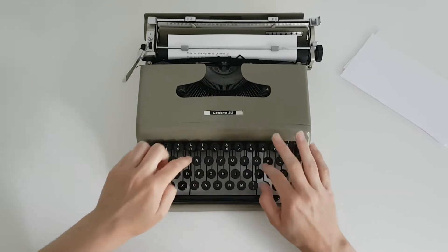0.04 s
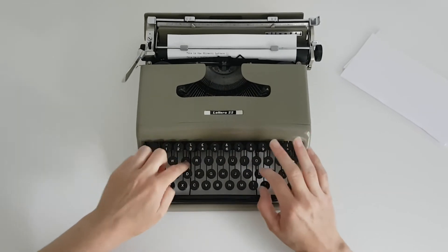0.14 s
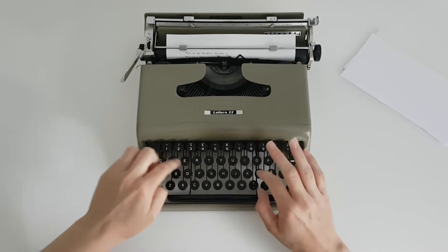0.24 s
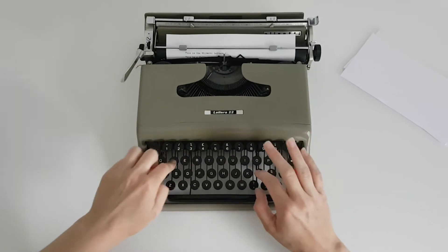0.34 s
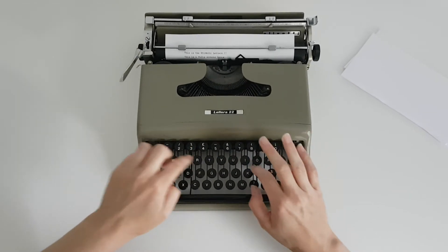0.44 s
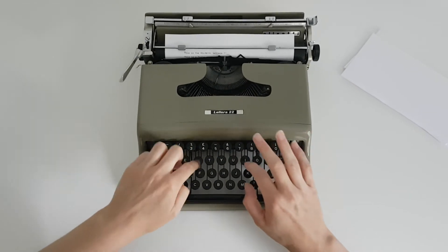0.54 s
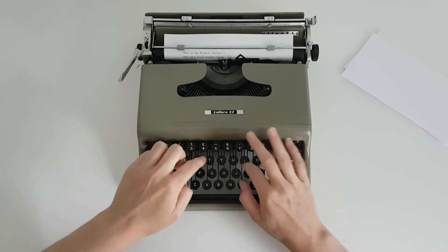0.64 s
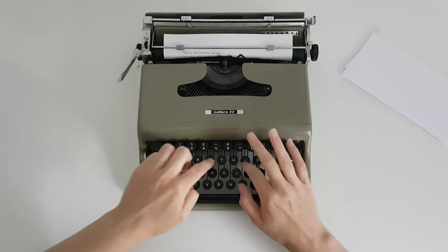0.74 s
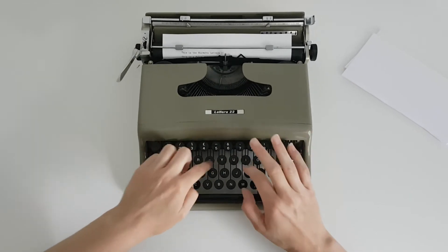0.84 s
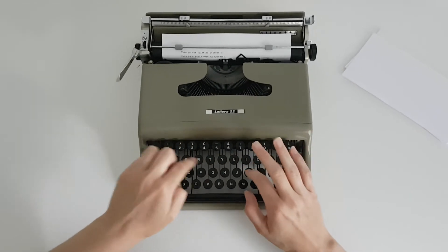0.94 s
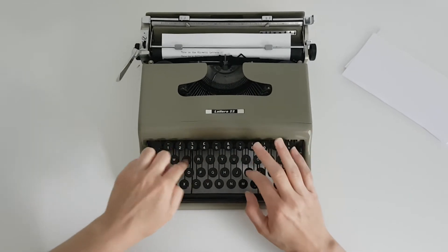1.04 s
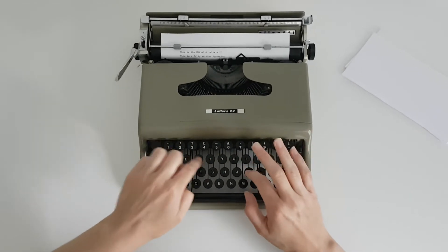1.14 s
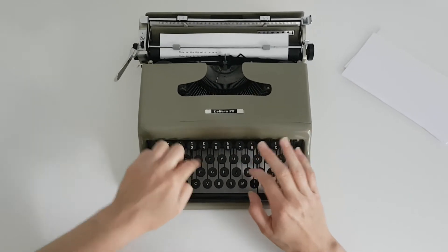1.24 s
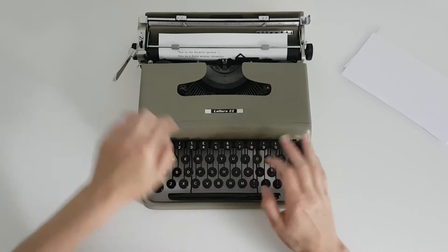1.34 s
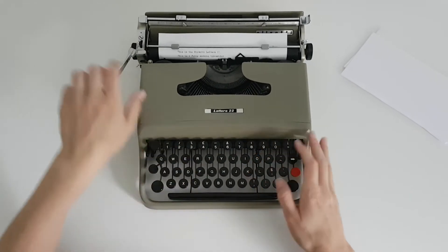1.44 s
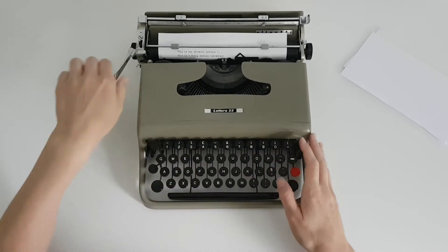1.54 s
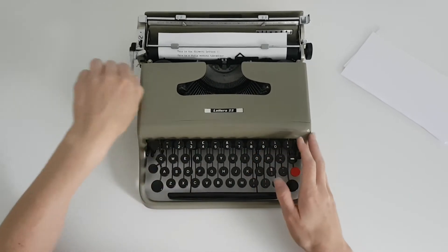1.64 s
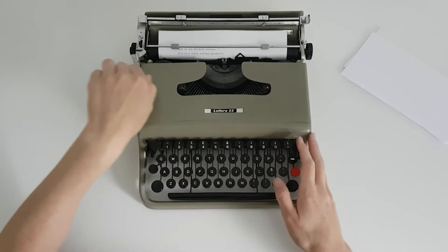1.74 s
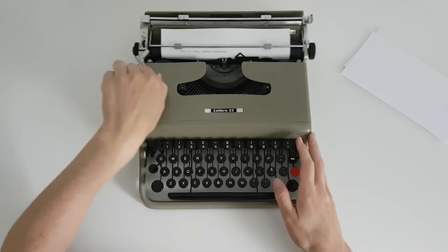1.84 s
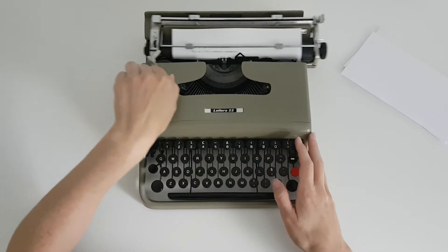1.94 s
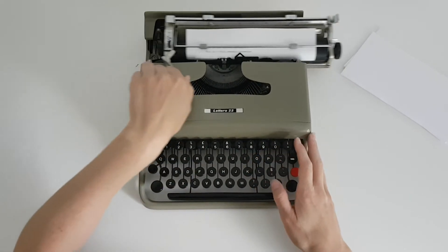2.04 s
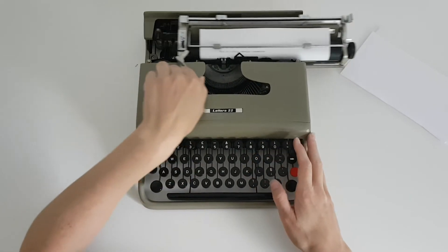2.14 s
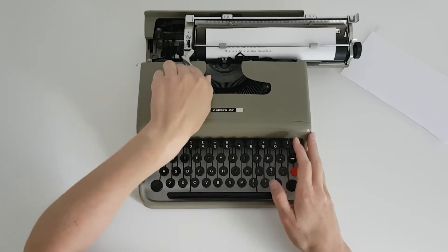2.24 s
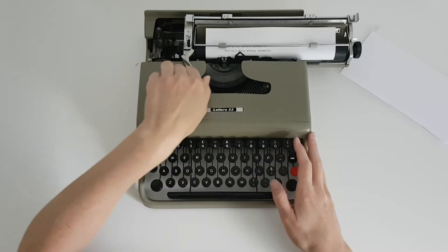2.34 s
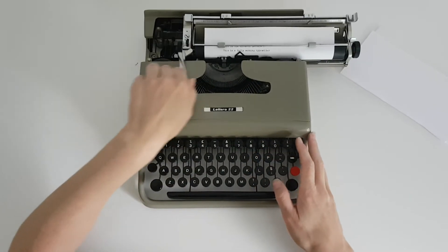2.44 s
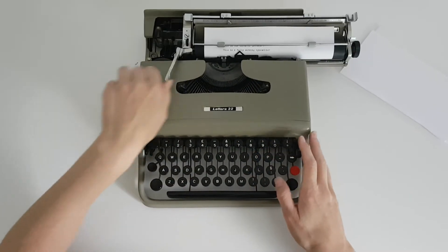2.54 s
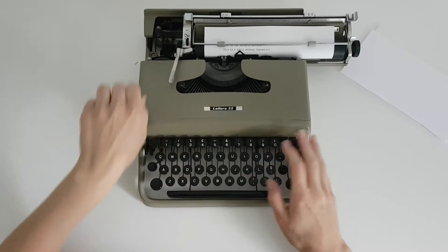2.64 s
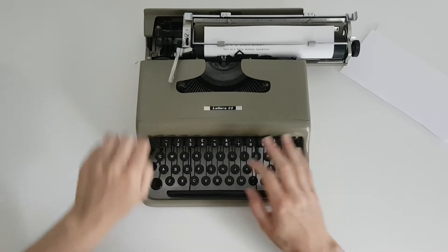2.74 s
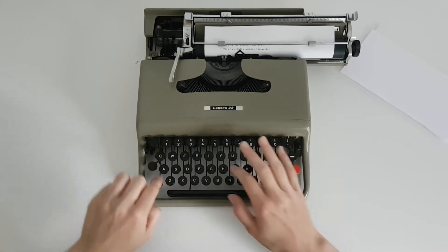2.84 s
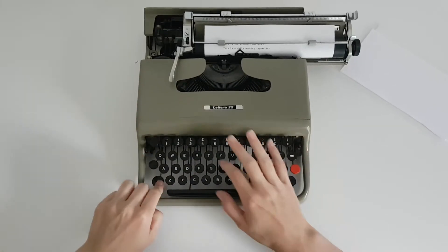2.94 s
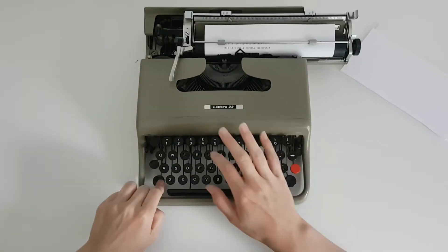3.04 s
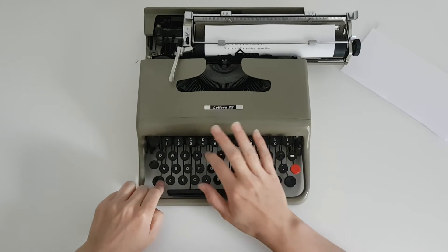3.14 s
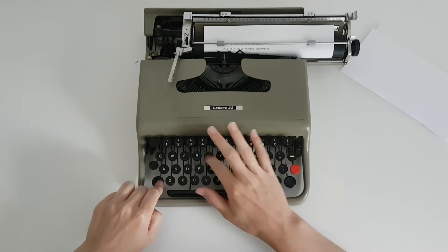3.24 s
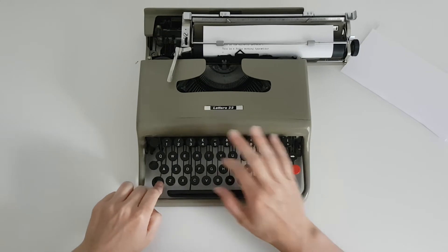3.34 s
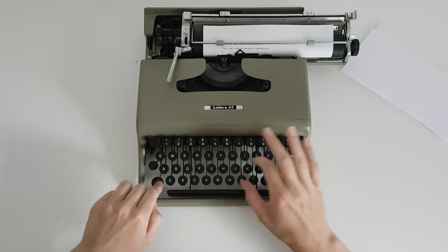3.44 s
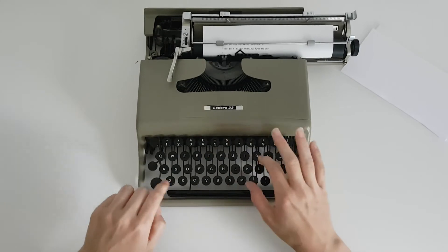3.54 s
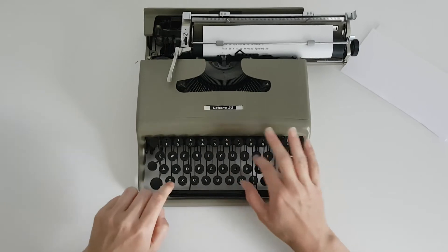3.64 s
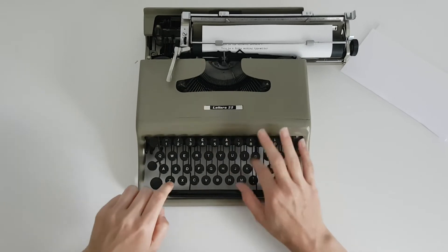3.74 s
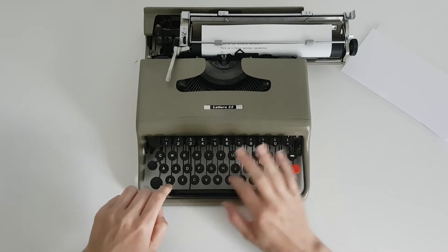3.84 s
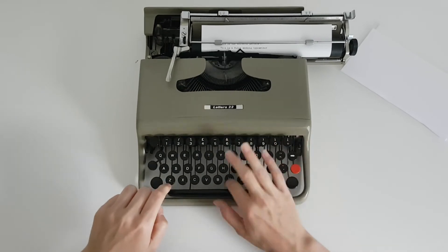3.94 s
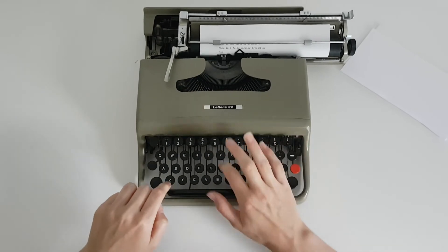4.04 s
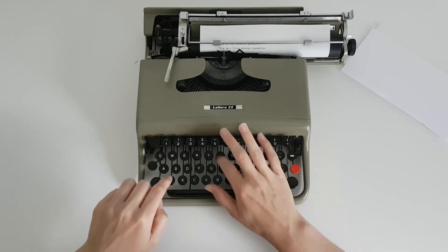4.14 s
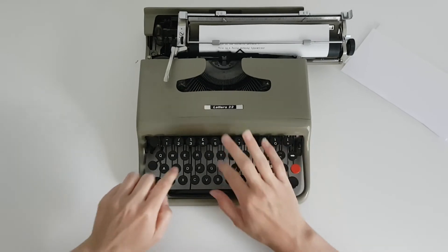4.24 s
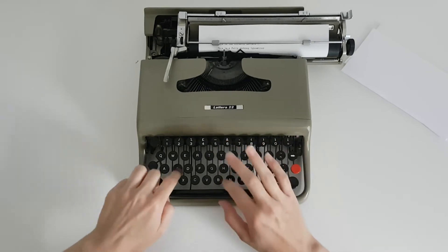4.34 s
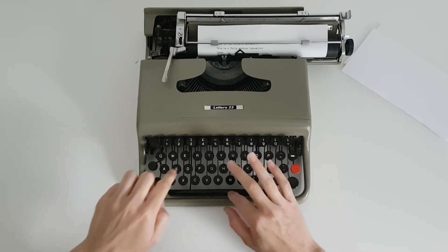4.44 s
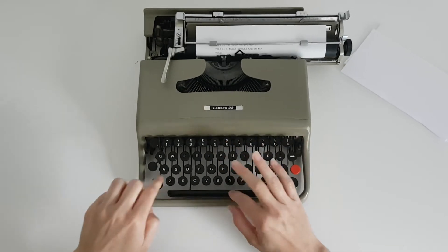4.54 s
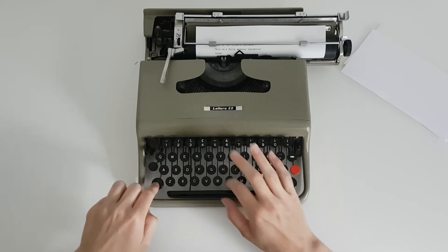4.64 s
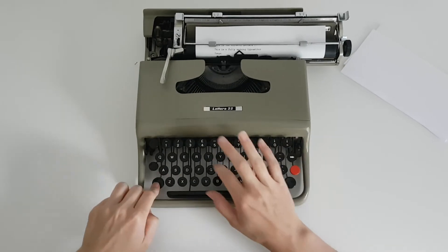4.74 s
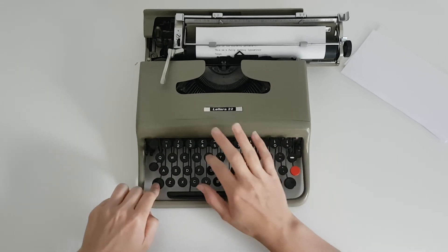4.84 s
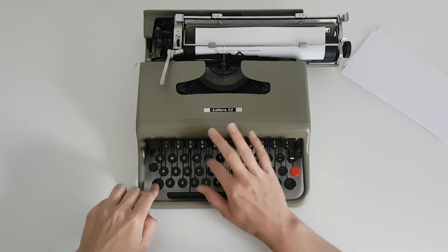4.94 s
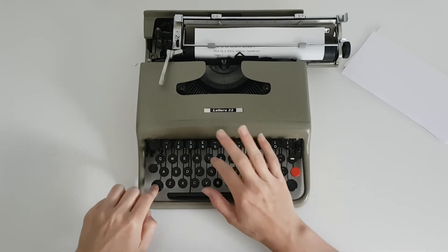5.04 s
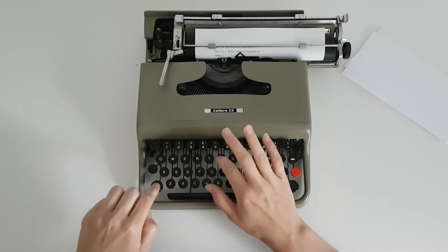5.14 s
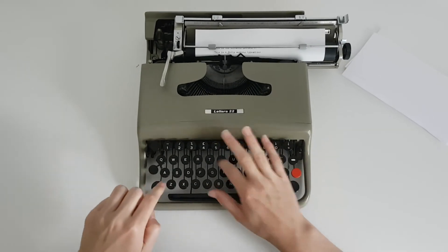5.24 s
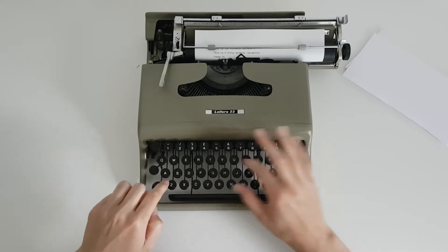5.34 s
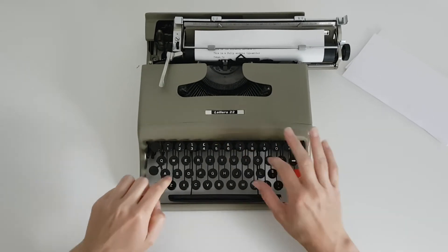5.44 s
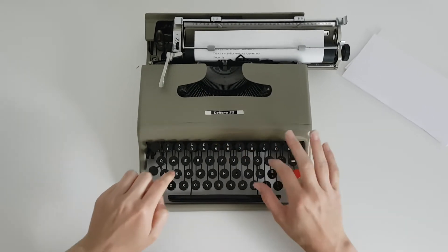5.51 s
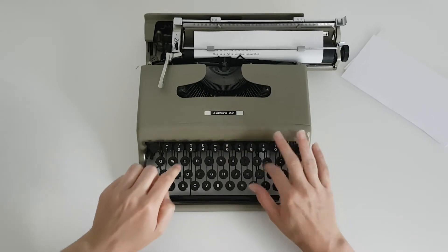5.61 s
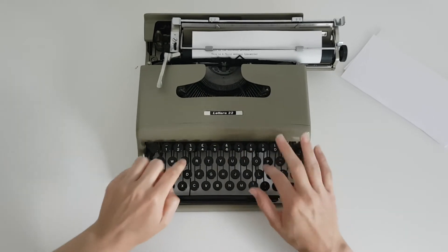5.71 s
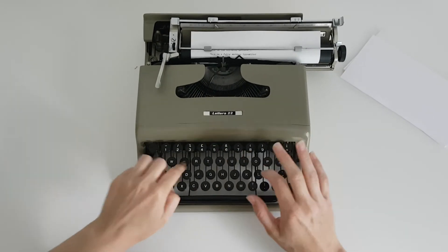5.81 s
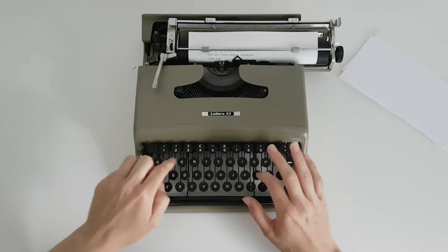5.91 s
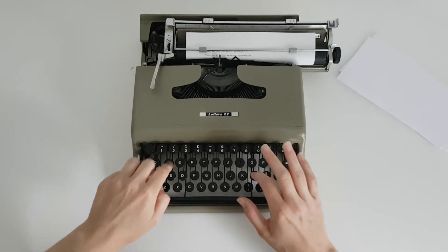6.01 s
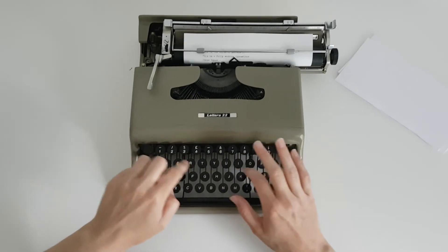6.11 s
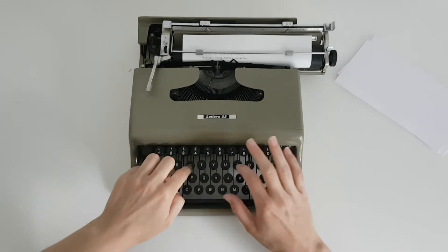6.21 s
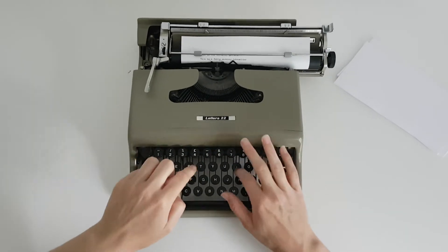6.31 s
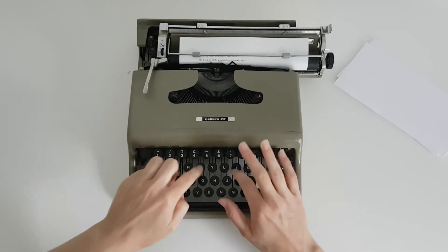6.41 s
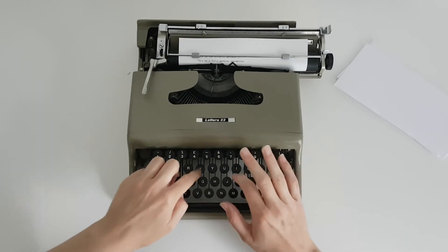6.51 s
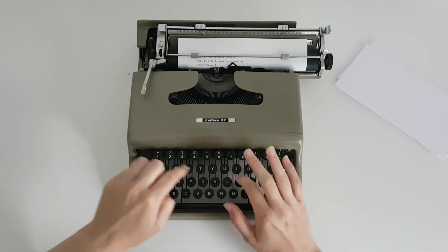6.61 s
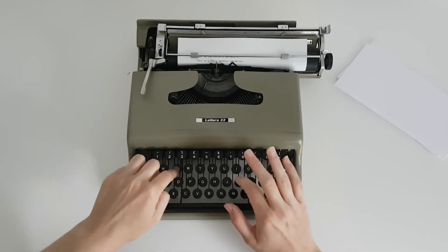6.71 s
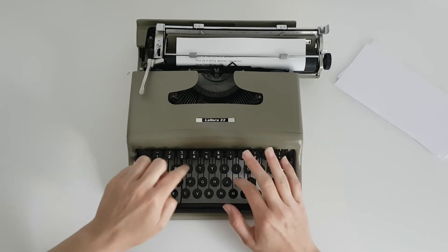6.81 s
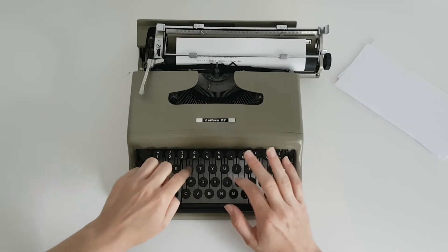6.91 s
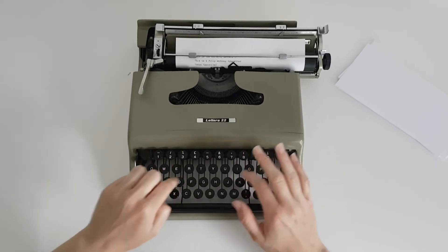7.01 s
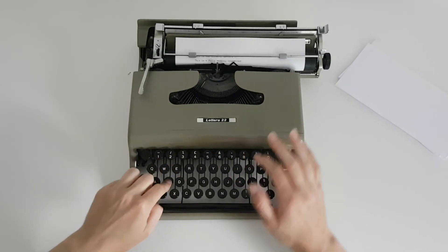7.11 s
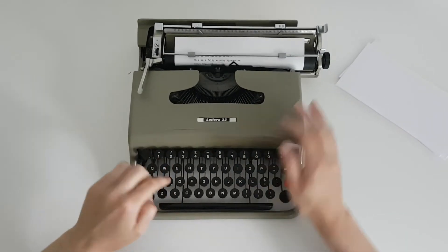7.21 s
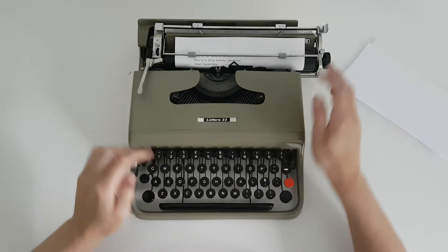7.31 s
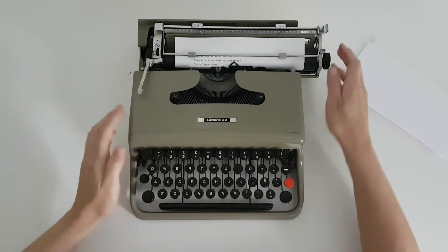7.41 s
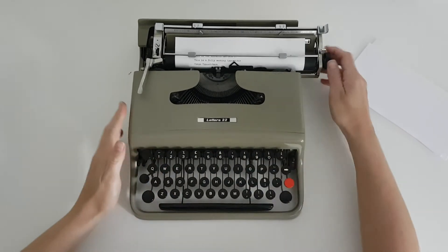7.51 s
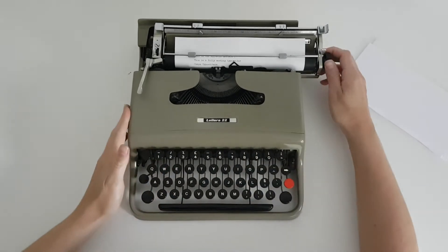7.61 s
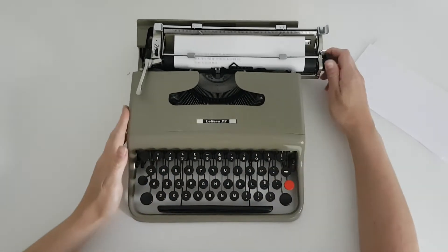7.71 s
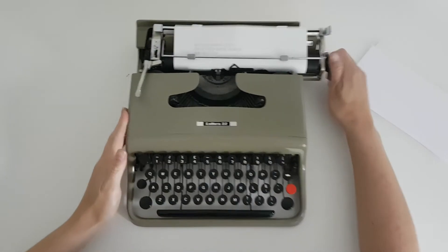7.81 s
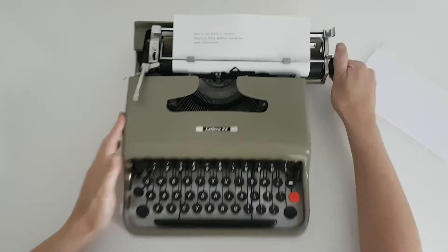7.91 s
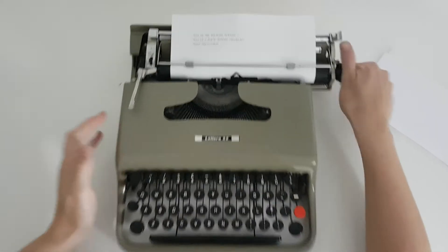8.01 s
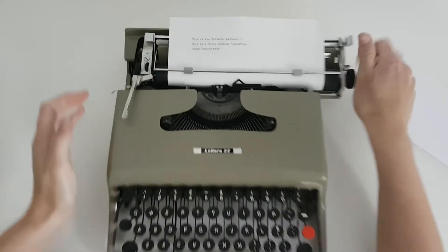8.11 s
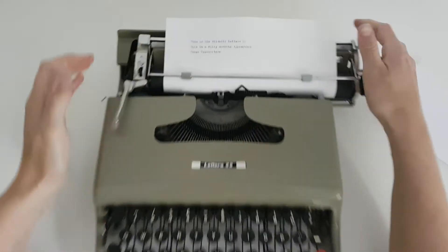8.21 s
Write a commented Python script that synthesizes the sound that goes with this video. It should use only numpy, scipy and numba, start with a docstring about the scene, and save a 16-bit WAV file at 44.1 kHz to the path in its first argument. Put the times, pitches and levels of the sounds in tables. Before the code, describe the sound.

A portable manual typewriter on a desk in a small bare room, heard close in stereo. Seven brisk, hard metallic key strikes with rattling linkage, then a near pause with faint ticks and squeaks. The carriage ratchets and slides back to a deep thud. Softer clunks follow, then uneven typing with shift and space bar thumps, quickening into a steady run. Finally the platen winds on with short clicks and rubbing, leaving quiet room tone.

```python
"""A portable manual typewriter on a desk in a small bare room.
A first run of keys: each rattles the linkage, its slug cracks on the platen and bounces, its bar falls back.
A low hum swells as the carriage slides back to a thud; typing resumes amid shift, space bar and stop thuds.
Last, the platen is wound on. Driven resonances and dying tones make the machine; faint squeaks come from
rubbing, echo from eight delay lines, room tone from shaped noise."""
import sys
import numpy as np
from scipy import signal
from scipy.fft import rfft, irfft
from scipy.io import wavfile
from scipy.ndimage import uniform_filter1d
from numba import njit

SR = 44100
rng = np.random.default_rng(int(sys.argv[2]) if len(sys.argv) > 2 else 0)


def log_audio(samples):
    """Write samples as a 16-bit WAV file to the path given in sys.argv[1]."""
    # one column per channel
    frames = np.atleast_2d(samples).T
    # limit to full scale, then quantise
    limited = np.clip(frames, -1, 1)
    pcm = np.round(limited * 32767).astype(np.int16)
    wavfile.write(sys.argv[1], SR, pcm)


N = 364266
T = np.arange(N) / SR

# Type slugs on the platen. Each row: start in seconds, steel level in dB, body level in dB, treble level in dB,
# slug ring in Hz, type basket ring in Hz, basket ring level in dB.
STRIKES = [(0.185, -11.5, -24.5, -22, 3560, 1355, -26.5), (0.3618, -10, -22, -17.5, 3440, 676, -29),
           (0.554, -9.5, -22.5, -19, 3920, 783, -23.5), (0.7045, -10.5, -25, -18, 3530, 724, -28.5),
           (0.8307, -8, -24, -18.5, 3580, 684, -27), (1.058, -11, -24, -20, 1640, 804, -25.5),
           (1.2244, -9.5, -23.5, -18.5, 3440, 1427, -21.5), (3.239, -12.5, -24.5, -17.5, 2580, 1030, -18.5),
           (3.7268, -10.5, -23.5, -18.5, 3190, 757, -28), (3.9558, -9, -24.5, -16, 2600, 1210, -31.5),
           (4.1707, -11, -24, -16, 2620, 734, -36), (4.3496, -9.5, -24.5, -18.5, 2480, 682, -29),
           (4.9473, -11.5, -25, -17.5, 2780, 1056, -18.5), (5.255, -9.5, -25.5, -16.5, 2630, 875, -31.5),
           (5.644, -10, -24.5, -17.5, 2610, 770, -32), (5.8106, -12, -24, -20, 2600, 820, -22),
           (6.02, -12, -25, -20.5, 1600, 668, -38), (6.2137, -13.5, -23.5, -22.5, 2530, 794, -24.5),
           (6.3454, -12, -24.5, -19, 3640, 715, -32), (6.4934, -9, -25.5, -17.5, 3740, 1120, -26),
           (6.7333, -10.5, -22.5, -19.5, 1550, 770, -22), (6.9208, -11.5, -24, -21.5, 3680, 796, -21),
           (7.1225, -10.5, -27, -19, 3620, 780, -25.5)]
# Bars and levers falling back; the first row, at 0.0 s, is the dying rattle of a blow struck just before the
# sound begins. Each row: start in seconds, steel level in dB, body level in dB, bar ring in Hz.
FALLS = [(0.0, -26.5, -29, 1730), (0.0812, -29.5, -28, 1750), (0.2704, -32.5, -30.5, 1650),
         (0.4584, -31, -31, 2010), (0.6374, -31, -29, 1650), (0.813, -27, -27, 1660),
         (0.9378, -30, -29.5, 1740), (1.151, -32, -29, 1650), (1.3213, -31, -29, 2030),
         (3.3291, -28.5, -30, 1840), (3.8225, -29.5, -28.5, 1840), (4.0362, -30, -27, 1830),
         (4.2672, -31.5, -29, 1830), (4.4509, -33, -30.5, 1840), (4.4933, -34, -31.5, 1570),
         (4.5196, -37, -40, 1690), (4.559, -31, -28.5, 1700), (5.053, -27, -28.5, 1840),
         (5.0956, -32, -30, 2010), (5.3447, -31, -28, 1730), (5.7398, -30.5, -31.5, 1700),
         (5.9105, -32.5, -30, 1840), (6.1108, -30.5, -30, 1740), (6.2952, -32, -32, 1700),
         (6.4398, -28, -31, 1810), (6.5809, -28.5, -27.5, 1850), (6.8328, -32.5, -31.5, 1920),
         (7.011, -31.5, -29.5, 1850), (7.224, -31.5, -29.5, 1850)]
# Carriage stop, lever, shift and space bar. Each row: start in seconds, steel level in dB, body level in dB,
# desk level in dB, clack in Hz, clack level in dB, clank in Hz.
THUDS = [(2.2142, -30, -30, -20.5, 245, -22.5, 3070), (2.392, -35.5, -39.5, -27.5, 1180, -39, 3730),
         (2.402, -37.5, -34, -34, 1120, -35, 4650), (2.915, -45.5, -40.5, -40, 1020, -32, 3030),
         (2.9672, -31.5, -30, -25.5, 671, -23.5, 4400), (3.5024, -29, -27, -25.5, 1080, -29, 2490),
         (4.6522, -44, -39.5, -29, 865, -28.5, 2570), (4.6939, -28.5, -27.5, -22, 839, -18, 3300),
         (4.7124, -49, -44.5, -37, 674, -24, 3600)]

KEY_LEAD_S = 0.041  # key starts down this long before its slug lands
BOUNCE_S, BOUNCE_DB = 0.006, -7  # after the blow; relative to it
LANDING_DB = -32.5  # bar landing


def undb(db):
    """Decibels to gain."""
    return 10 ** (np.asarray(db) / 20)


def unit(x):
    """Scale to rms 1."""
    return x / np.sqrt(np.mean(x ** 2))


def typewriter():
    """The same moves shake steel linkage, desk, frame, springs and the finest parts; each rings its own modes."""
    # Resonances of each part. Each row: centre in Hz, width in Hz, relative level in dB.
    steel_modes = [(1658, 330, 2), (2095, 190, 2), (2440, 300, 2), (3100, 330, 3), (3690, 350, 4.5),
                   (4370, 800, 0.5)]
    rail_modes = [(1221, 150, -12.5), (1840, 210, -3), (2480, 570, -6.5), (3360, 900, -11),
                  (4520, 400, -17)]
    roller_modes = [(2010, 240, -2.5), (2420, 220, -4), (3300, 800, 1), (4400, 600, -5.5)]
    desk_modes = [(58, 19, -6.5), (86.3, 6.9, 2), (141, 6.3, -2.5), (181, 15, -2), (232, 13, 0.5),
                  (261.3, 8.7, -3), (289, 68, -6)]
    frame_modes = [(361.2, 17, -10), (430.6, 64, -4.5), (527, 120, -6), (668, 27, -2), (750.6, 45, -2),
                   (880, 200, 0), (1024, 28, -4.5), (1103, 39, -3.5), (1241, 66, -3), (1379, 88, -6)]
    spring_modes = [(4780, 1370, -3), (6390, 1000, 0), (7696, 1800, -3)]
    fizz_modes = [(10260, 2600, -7.5), (11340, 1900, 2), (15100, 1600, 0.5)]
    # Likeness of left and right by part name, 0 to 1.
    likeness = {"desk": 0.97, "frame": 0.75, "steel": 0.33, "springs": 0.09, "fizz": 0.35, "rail": 0.17}

    def part(name, modes, power, scatter_db, hits=0, size=16):
        drive = np.sqrt(power) * chatter(likeness[name], scatter_db, size)
        return resonate(drive + hits, modes)

    steel_power = shaking("steel", 0.011, -15.5, 0.11, -0.45, 0.15)
    steel = part("steel", steel_modes, steel_power, 3.3, blows("steel", 3, 6.7, 5.2))
    # rollers and ratchet slip in longer jerks
    rail = part("rail", rail_modes, sliding("glide", "steel"), 3.1, size=200)
    rail += part("rail", roller_modes, sliding("wind", "steel"), 2.5, size=40)
    desk_power = shaking("desk", 0.017, -0.38, 0.56, 0.55)
    desk = part("desk", desk_modes, desk_power, 1.0, blows("desk", 22, 24, 21.4))
    frame_power = shaking("frame", 0.017, -6.0, 0.24, 3.0)
    frame = part("frame", frame_modes, frame_power, 2.5, blows("frame", 11, 17, 19))
    spring_power = shaking("springs", 0.023, -16.5, 0.25, -6.0, 0.14)
    springs = part("springs", spring_modes, spring_power, 3.5, blows("springs", 11.0, 7, 8.5))
    fizz_power = shaking("fizz", 0.034, -14.0, 0.16, -7.0, 0.1)
    fizz = part("fizz", fizz_modes, fizz_power, 3.2, blows("fizz", 14, 8, 19.0))
    return steel + rail + desk + frame + springs + fizz + slugs() + pings(count=5) + squeaks()


def slugs():
    """Slugs crack and ring at blow and bounce, the basket rings, bars ring as they land, heavy levers clack."""
    crack_hz, crack_db, crack_t60_s = 3514, -2, 0.0098  # first contact of metal on the hard roller
    slug_db, slug_t60_s = -8.5, 0.025  # over the steel level
    clank_db = 1.5  # over the steel level
    strike, fall, thud = (np.transpose(rows) for rows in (STRIKES, FALLS, THUDS))
    ring_db = strike[1] + slug_db
    crack = rings(strike[0], strike[1] + crack_db, np.full(len(STRIKES), crack_hz), crack_t60_s)
    blow = rings(strike[0], ring_db, strike[4], slug_t60_s)
    bounce = rings(strike[0] + BOUNCE_S, ring_db + BOUNCE_DB, strike[4], slug_t60_s)
    basket = rings(strike[0] + 0.003006, strike[6], strike[5], 0.065)
    landing = rings(fall[0] - 0.003, np.full(len(FALLS), LANDING_DB), fall[3], 0.067)
    clack = rings(thud[0] + 0.0011, thud[5], thud[4], 0.066)
    clank = rings(thud[0] + 0.0014, thud[1] + clank_db, thud[6], 0.022)
    return crack + blow + bounce + basket + landing + clack + clank


def shaking(part, crack_t60_s, after_db, after_t60_s, travel_db, fall_t60_s=0.18):
    """Power that drives one part, summed over all moves."""
    # Pawls and catches. Each row: start in seconds, steel level in dB, body level in dB, treble level in dB.
    ticks = [(0.2984, -26, -34, -28.5), (1.1735, -27, -31.5, -27), (1.6736, -47.5, -57, -54),
             (1.734, -51.5, -54, -55), (1.7665, -51, -50, -58), (1.803, -41, -58, -50),
             (1.8267, -41, -48, -46), (1.85, -39.5, -39, -44.5), (2.087, -56, -38, -60),
             (2.1402, -49, -40, -56), (2.3745, -51, -58, -51), (2.4796, -39, -35, -39.5),
             (2.5047, -37, -48, -39.5), (2.5277, -42, -45, -40), (2.602, -48, -45, -62),
             (4.584, -28.5, -44, -34), (5.9343, -26, -33, -26), (6.8556, -28, -25.5, -27.5),
             (7.729, -41, -48, -58), (7.754, -42, -44, -37), (7.8197, -42, -46, -46),
             (7.8397, -35, -44, -41), (7.9356, -34.5, -31.5, -36), (8.0556, -49, -67, -60)]
    fall_click_db, key_click_db = 1, 2.5  # sharp first contact, over the rattle that follows
    strike_s, thud_s, tick_s = (np.transpose(rows)[0] for rows in (STRIKES, THUDS, ticks))
    fall_s = falling(part)
    hit_db = reach("strike", STRIKES, part)
    fall_db = reach("fall", FALLS, part)
    key_s = strike_s - KEY_LEAD_S
    key_db = np.full(len(strike_s), -40 + travel_db)

    power = bursts(strike_s, hit_db, 0.00063, 0.00085, crack_t60_s)
    power += bursts(strike_s + BOUNCE_S, hit_db + BOUNCE_DB, 0.00024, 0.00033, crack_t60_s)
    # escapement and ribbon feed keep rattling after the blow
    power += bursts(strike_s, hit_db + after_db, 0.009, 0.018, after_t60_s)
    power += bursts(key_s, key_db, 0.0061, KEY_LEAD_S, 0.03)
    power += bursts(fall_s, fall_db, 0.0072, 0.0099, fall_t60_s)
    if part != "desk":
        power += bursts(fall_s, fall_db + fall_click_db, 0.00058, 0.00082, 0.027)
        power += bursts(key_s, key_db + key_click_db, 0.00036, 0.0014, 0.02)
    power += bursts(thud_s, reach("thud", THUDS, part), 0.00065, 0.004, 0.19)
    power += bursts(tick_s, reach("tick", ticks, part), 0.000526, 0.00064, 0.075)
    if part != "steel":  # rail and rollers carry the steel's share
        power += sliding("glide", part) + sliding("wind", part)
    return power


def blows(part, strike_db, fall_db, thud_db):
    """One clean impulse opens every blow; the part rings from it."""
    out = np.zeros(N)
    for kind, rows, db in (("strike", STRIKES, strike_db), ("fall", FALLS, fall_db), ("thud", THUDS, thud_db)):
        times_s = falling(part) if kind == "fall" else np.transpose(rows)[0]
        at = np.maximum(times_s * SR, 0).astype(int)
        out[at] += undb(reach(kind, rows, part) + db)
    return out


def falling(part):
    """Moments when each fall reaches one part: the bar meets its rest, the linkage snaps tight just after."""
    treble_lag_s = 0.0065
    return np.transpose(FALLS)[0] + treble_lag_s * (part in ("springs", "fizz"))


def reach(kind, rows, part):
    """Level in dB that each row of a table brings to one part."""
    # Part names, in the column order of reach_db.
    parts = ["steel", "desk", "frame", "springs", "fizz"]
    # Coupling of each kind of move. Each row: steel, desk, frame, springs, fizz, in dB over the move's level.
    reach_db = {"strike": (-1, -8, -2, 0.5, -6), "fall": (-0.5, -0.1, 0, -5, -6),
                "thud": (-1, -2, 0, -5.5, -10), "tick": (-2, -11, -3, -1.5, -5),
                "glide": (-1, -1.7, -1.5, -20.5, -31), "wind": (1, 0.8, -2, -1.5, -5.5)}
    own = {"strike": ("springs", "fizz"), "tick": ("springs", "fizz"), "thud": ("desk",)}.get(kind, ())
    if part in own:
        column = 3
    elif part in ("desk", "frame"):
        column = 2
    else:
        column = 1
    return np.transpose(rows)[column] + reach_db[kind][parts.index(part)]


def sliding(kind, part):
    """Power of the rubbing that reaches one part."""
    # Carriage gliding back, then platen wound on. Each row: time in seconds, steel level in dB, body level in dB.
    slides = [
        [(1.6, -61, -62), (1.7, -64, -50.5), (1.85, -45, -46), (1.92, -55, -51.5), (1.97, -48, -46),
         (2.15, -46, -45.5), (2.2, -49, -48)],
        [(7.71, -72, -68), (7.73, -56, -47.5), (7.765, -42, -40.5), (7.81, -45.5, -44), (7.84, -45, -41.5),
         (7.935, -40, -41.5), (8.03, -69, -49.5), (8.14, -66, -59.5), (8.19, -65, -80)],
    ]
    slide = slides[kind == "wind"]
    level_db = np.interp(T, np.transpose(slide)[0], reach(kind, slide, part), -120, -120)
    return undb(2 * level_db)


def pings(count):
    """Loose levers knock a few times after each fall and blow, each a short ring of its own pitch."""
    ping_db, spread_db, within_s = -3.5, 4.5, 0.07
    low_hz, octaves, t60_s = 1102, 2.3, 0.022
    falls = [row[:2] for row in FALLS]
    bounces = [(row[0] + BOUNCE_S, LANDING_DB) for row in STRIKES]
    after = np.array(falls + bounces)
    late, pitch, size = rng.random((len(after), count, 3)).T
    times_s = after[:, 0] + within_s * late
    # later knocks tend to be weaker
    dbs = after[:, 1] + ping_db + spread_db * (size - late) * 2
    pitches_hz = low_hz * 2 ** (octaves * pitch)
    return rings(times_s.ravel(), dbs.ravel(), pitches_hz.ravel(), t60_s)


def squeaks():
    """Short rubbed metal tones, slightly rough."""
    # Faint squeaks. Each row: middle in seconds, half length in seconds, pitch in Hz, level in dB.
    squeak_rows = [(1.495, 0.015, 3800, -61), (1.64, .03, 2530, -67), (1.987, .02, 1237, -42),
                   (2.045, .015, 5760, -59), (2.097, 0.017, 1885, -42.5), (7.707, 0.02, 2900, -66),
                   (7.768, .015, 2390, -47), (7.867, 0.045, 2010, -43.5)]
    rough = 1 + 0.41 * unit(uniform_filter1d(rng.standard_normal(N), size=200))
    tones = np.zeros(N)
    for middle_s, half_s, hz, db in squeak_rows:
        swell = np.exp(-((T - middle_s) / half_s) ** 2)
        tones += undb(db) * swell * np.sin(2 * np.pi * hz * T)
    return rough * tones


def resonate(x, modes):
    """Ring a bank of resonances, scaled to pass steady noise at its own level."""
    f = np.arange(N // 2 + 1) * SR / N + 1e-3
    h = 0
    for k, (hz, width_hz, db) in enumerate(modes):
        bandpass = 1j * f * width_hz / (hz ** 2 - f ** 2 + 1j * f * width_hz)
        h = h + (-1) ** k * undb(db) * bandpass / np.sqrt(width_hz)
    return irfft(rfft(x) * h / np.sqrt(np.mean(abs(h) ** 2)), N)


def chatter(alike, scatter_db, size):
    """Dense tiny impacts of uneven but bounded size, partly the same left and right."""
    alike = np.clip(alike, 0, 1)
    jerks = np.minimum(rng.exponential(size=N // size + 1), 3.5)
    force = np.repeat(undb(scatter_db * jerks), size)[:N]
    mid, side = force * rng.standard_normal((2, N))
    return unit(np.sqrt(1 + alike) * mid + np.sqrt(1 - alike) * side * np.array([[1], [-1]]))


def bursts(times_s, dbs, rise_s, hold_s, t60_s):
    """Power of shaking: each event rises, holds and dies away; powers add."""
    t = np.arange(int(0.4 * SR)) / SR
    shape = (1 - np.exp(-t / rise_s)) ** 2 * undb(-120 * np.maximum(t - hold_s, 0) / t60_s)
    power = np.zeros(N + len(t))
    for s, db in zip(times_s, dbs):
        i = max(int(s * SR), 0)
        power[i:i + len(t)] += undb(2 * db) * shape
    return power[:N]


def rings(times_s, dbs, pitches_hz, t60_s):
    """A dying sine for each blow, at the pitch given for it."""
    t = np.arange(int(0.1 * SR)) / SR
    out = np.zeros(N)
    for s, db, hz in zip(times_s, dbs, pitches_hz):
        i = max(int(s * SR), 0)
        out[i:i + len(t)] += undb(db - 60 * t / t60_s) * np.sin(2 * np.pi * hz * t)
    return out


@njit
def walls(x, lags, gain, damp):
    """Eight delay lines that feed each other, duller on every round."""
    line, soft, out = np.zeros((8, 4096)), np.zeros(8), np.zeros((2, len(x)))
    for i in range(len(x)):
        total = 0.
        for k in range(8):
            soft[k] += (1 - damp) * (gain[k] * line[k, (i - lags[k]) & 4095] - soft[k])
            total += soft[k]
            out[k % 2, i] += soft[k]
        for k in range(8):
            line[k, i & 4095] = x[i] + soft[k] - total / 4
    return out


def echo(machine):
    """Wall reflections of the machine; the small case sends little bass into the room."""
    # Delay of each wall path in samples.
    paths = np.array([557, 743, 941, 1151, 1373, 1607, 1879, 2153])
    t60_s, damp, level_db, low_hz = 0.37, 0.16, -10, 398  # t60 before damping
    sent = signal.sosfilt(signal.butter(1, low_hz, "high", fs=SR, output="sos"), machine.mean(axis=0))
    back = walls(sent, paths, undb(-60 * paths / SR / t60_s), damp)
    # long waves reach both microphone ports alike
    unlike = signal.sosfilt(signal.butter(1, 600, fs=SR, output="sos"), back[0] - back[1]) / 2
    return undb(level_db) * (back - unlike * np.array([[1], [-1]]))


def hum():
    """A low sine that swells slowly and fades fast."""
    hum_hz, from_s, peak_s, peak_db = 52, 1.42, 1.84, -50
    swell_db_per_s, fade_db_per_s = 14, 80
    late_s = T - peak_s
    level_db = peak_db + np.minimum(swell_db_per_s * late_s, -fade_db_per_s * late_s)
    return undb(level_db) * (T > from_s) * np.sqrt(2) * np.sin(2 * np.pi * hum_hz * T)


def air():
    """Quiet room tone: shaped noise, alike left and right in the bass."""
    # Spectrum of the room tone. Each row: frequency in Hz, relative density in dB per Hz.
    spectrum = np.array([(15, -54), (25, -18), (60, -1), (121, -10.5), (273, -10.5), (524, -15.5),
                         (766, -18.5), (2670, -29.5), (8830, -47), (15200, -42), (16500, -25.5)])
    level_db = -56
    f = np.arange(N // 2 + 1) * SR / N + 1
    colour = undb(np.interp(np.log(f), np.log(spectrum[:, 0]), spectrum[:, 1]))
    mid, side = rfft(rng.standard_normal((2, N))) * colour
    width = np.clip(f / 1500, 0.12, 1)
    tone = irfft(mid + width * side * np.array([[1], [-1]]), N)
    return undb(level_db) * unit(tone)


def scene():
    """Typewriter, its echo off the walls, low hum, room tone."""
    machine = typewriter()
    return machine + echo(machine) + hum() + air()


def record(dry):
    """The left port is brighter and phase-shifted by the phone body; the top steps down, then is cut."""
    # Treble lift of the left port: centre in Hz, width in Hz, lift in dB.
    left_treble = (9300, 2500, 3.1)
    # Phase lead of the left port. Each row: frequency in Hz, lead in radians.
    left_lead = [(0, 0), (520, -0.1), (1640, 0.6), (2580, 0.1), (3620, 1.3), (4820, 0.6), (6370, 3.0),
                 (7240, 0.3), (8180, 3.6), (9730, -0.6), (11200, 2.9), (13900, -0.9), (15000, -5.7),
                 (16500, -3.6)]
    left_db, edge_hz, top_hz = -0.3, 15800, 16950
    f = np.arange(N // 2 + 1) * SR / N
    hz, width_hz, lift_db = left_treble
    gain = undb(left_db + lift_db * np.exp(-((f - hz) / width_hz) ** 2))
    port = gain * np.exp(1j * np.interp(f, *np.transpose(left_lead)))
    both = np.array([irfft(rfft(dry[0]) * port, N), dry[1]])
    both = signal.sosfilt(signal.ellip(6, 0.2, 25, edge_hz, fs=SR, output="sos"), both)
    return signal.sosfilt(signal.ellip(10, 0.2, 50, top_hz, fs=SR, output="sos"), both)


dry = scene()
out = record(dry)
log_audio(out)
```